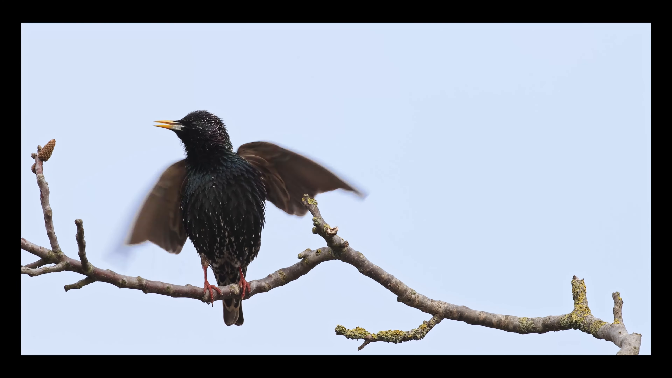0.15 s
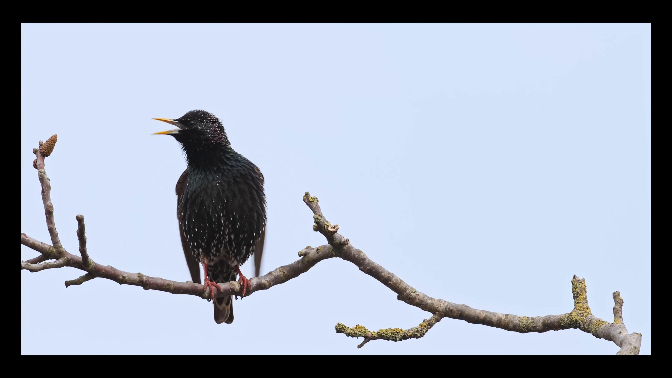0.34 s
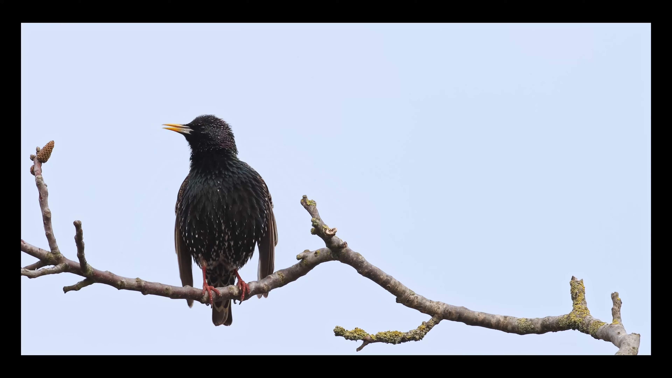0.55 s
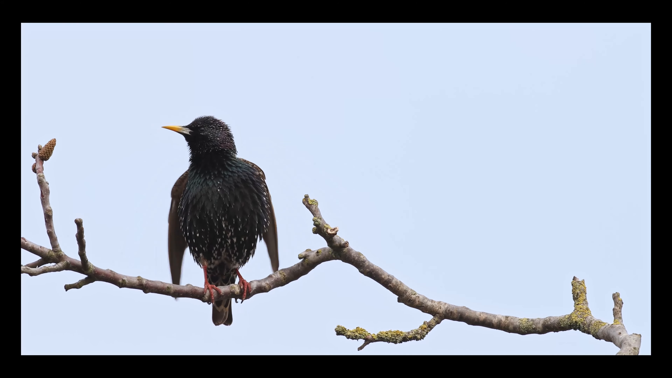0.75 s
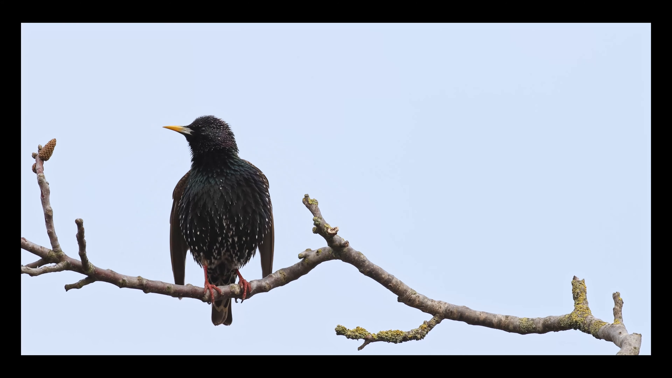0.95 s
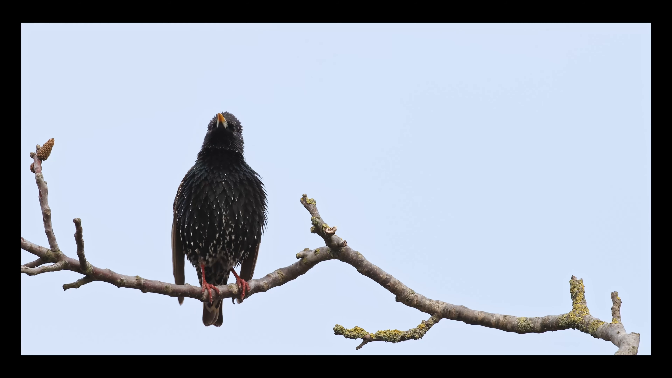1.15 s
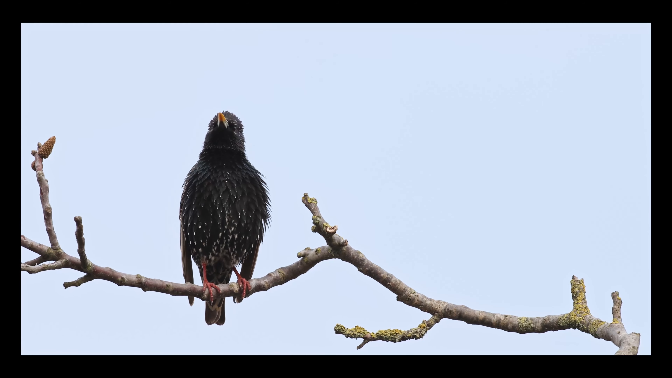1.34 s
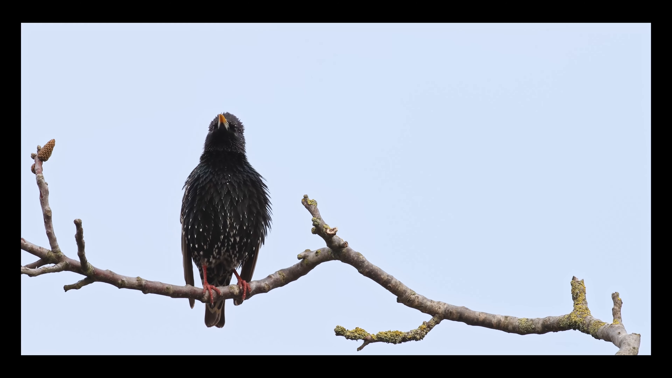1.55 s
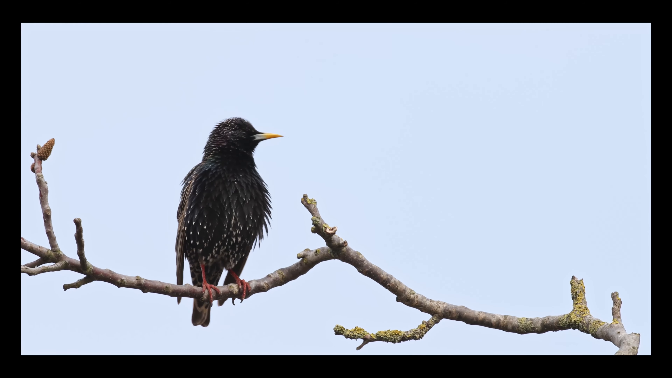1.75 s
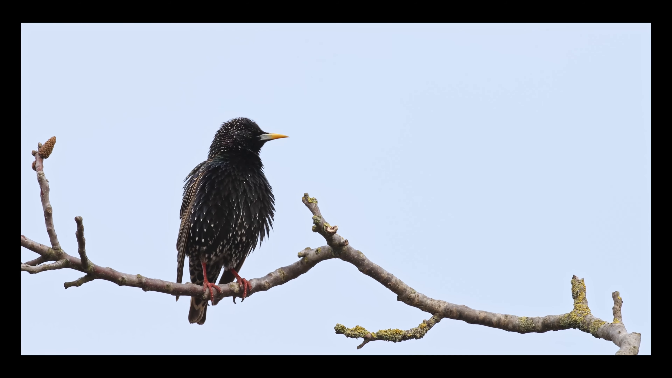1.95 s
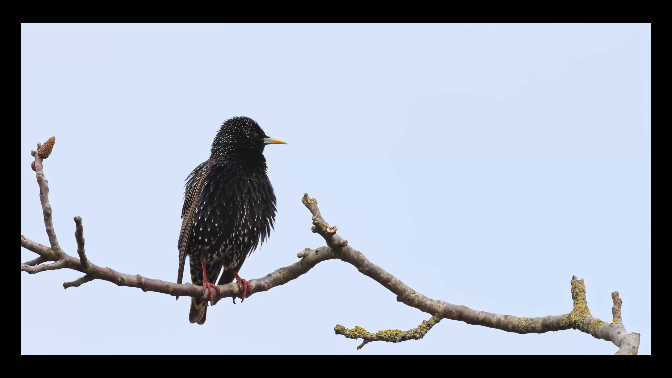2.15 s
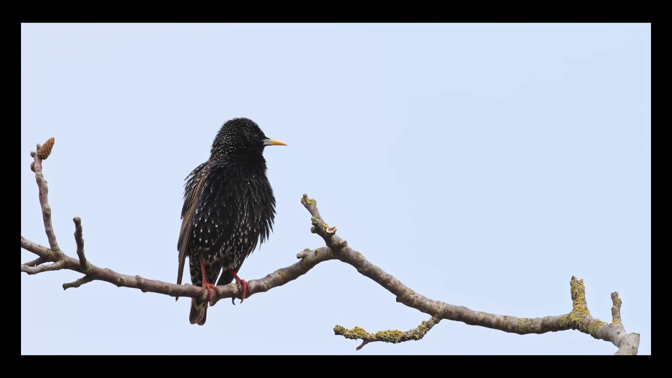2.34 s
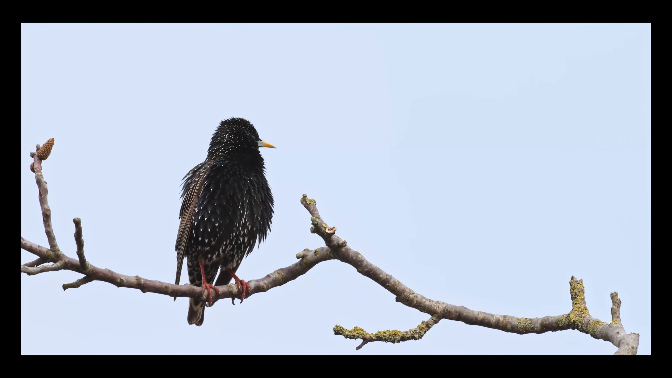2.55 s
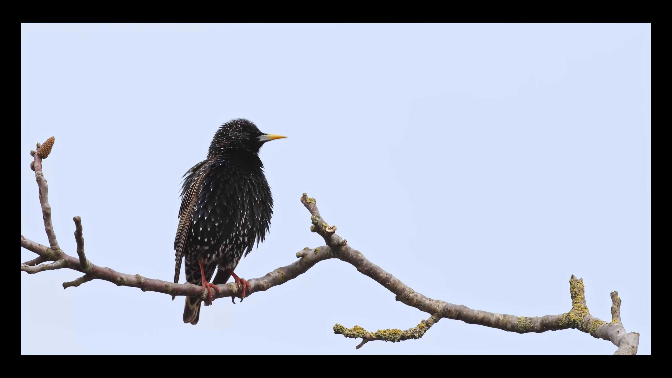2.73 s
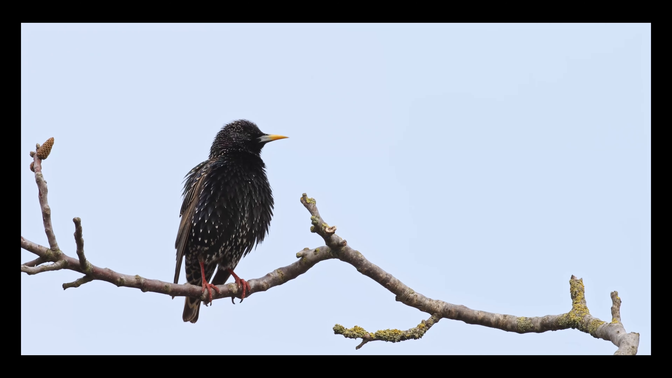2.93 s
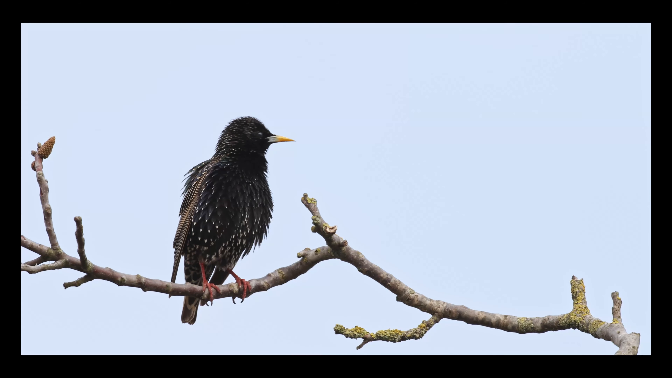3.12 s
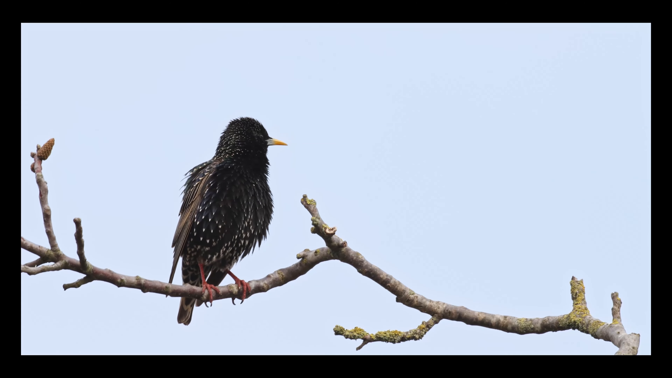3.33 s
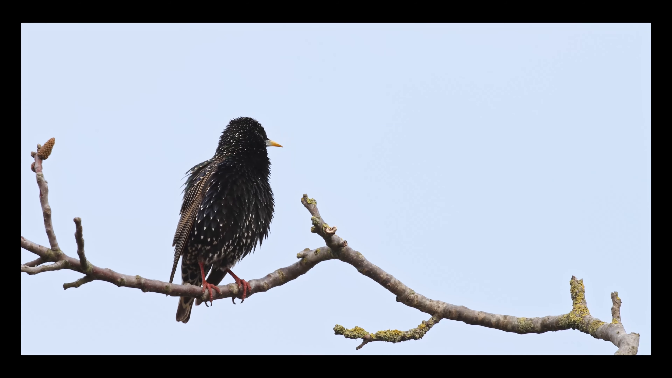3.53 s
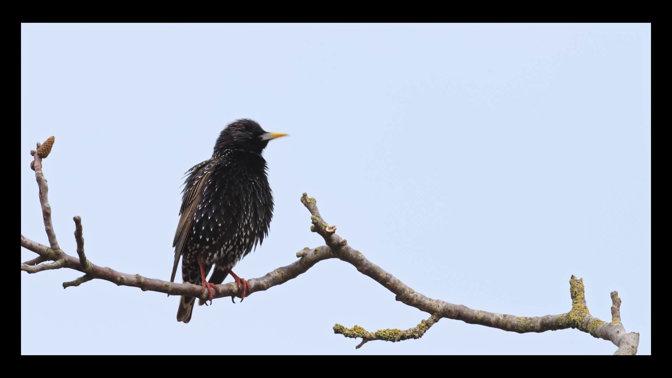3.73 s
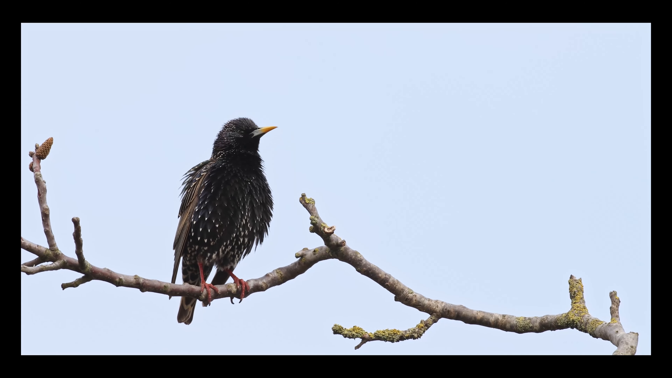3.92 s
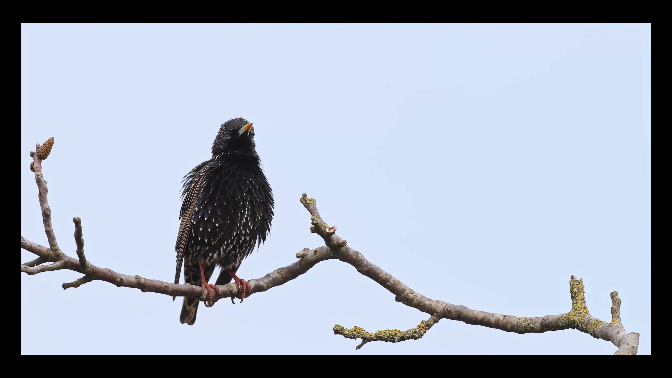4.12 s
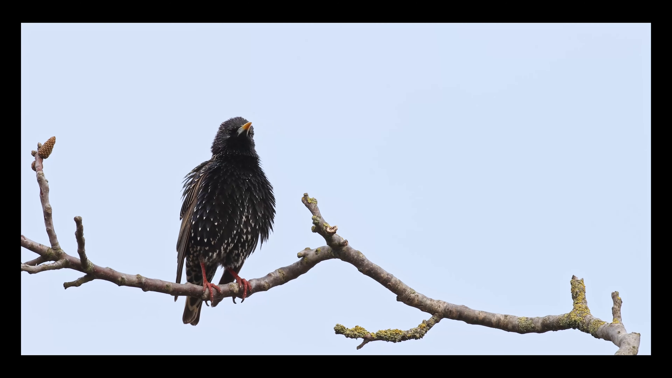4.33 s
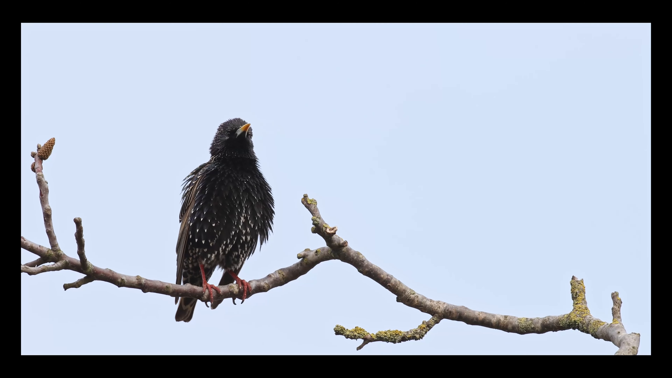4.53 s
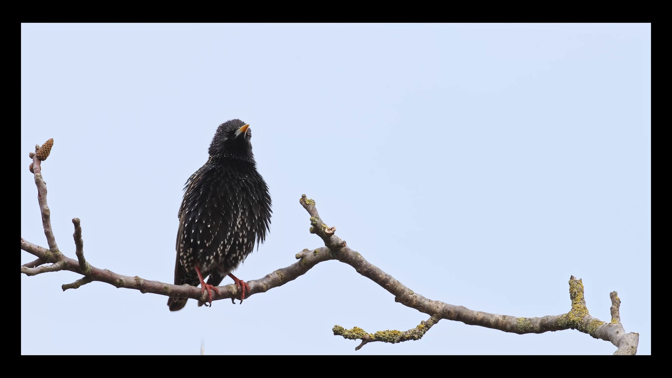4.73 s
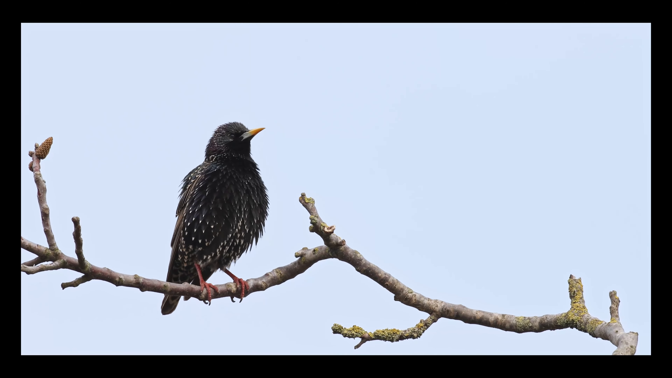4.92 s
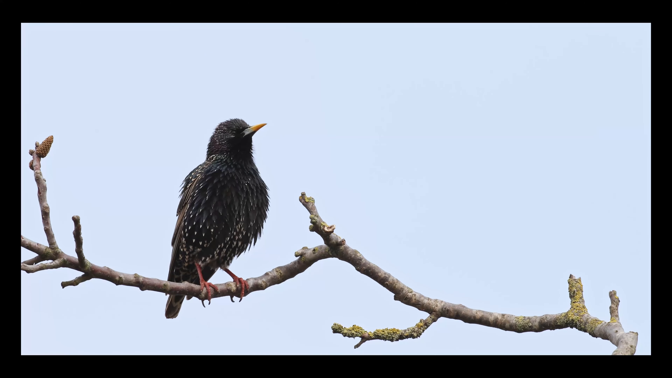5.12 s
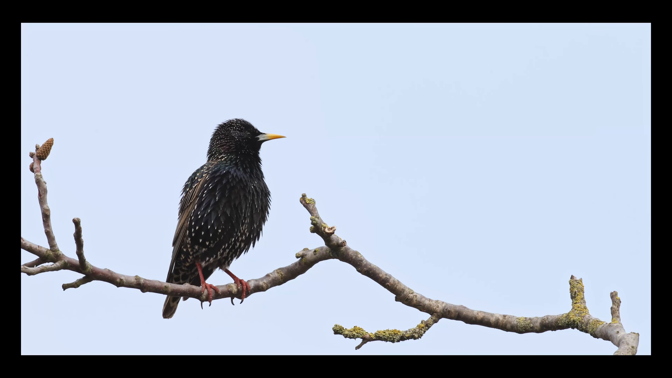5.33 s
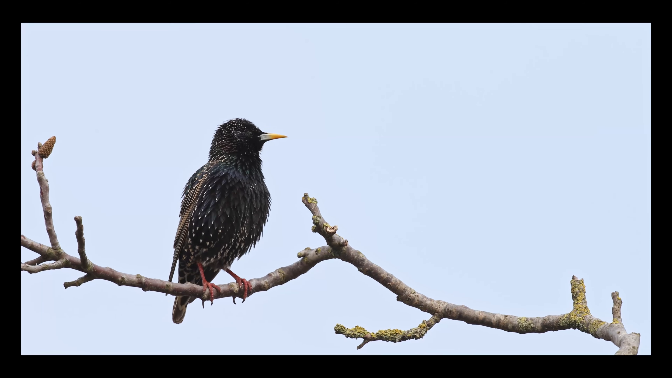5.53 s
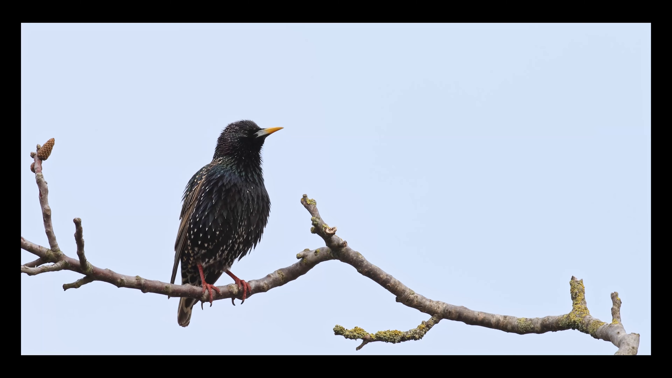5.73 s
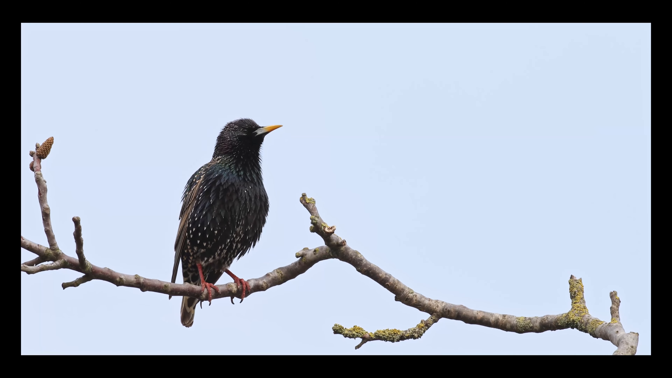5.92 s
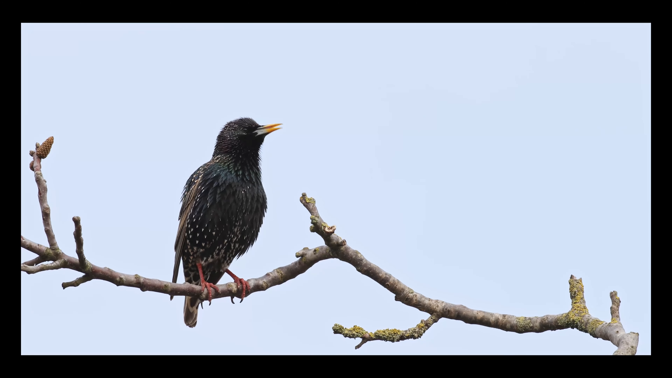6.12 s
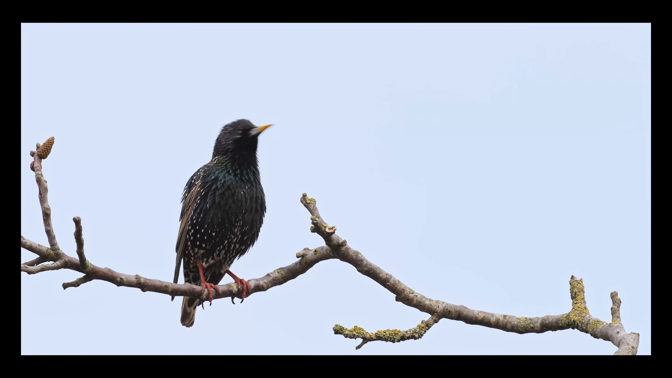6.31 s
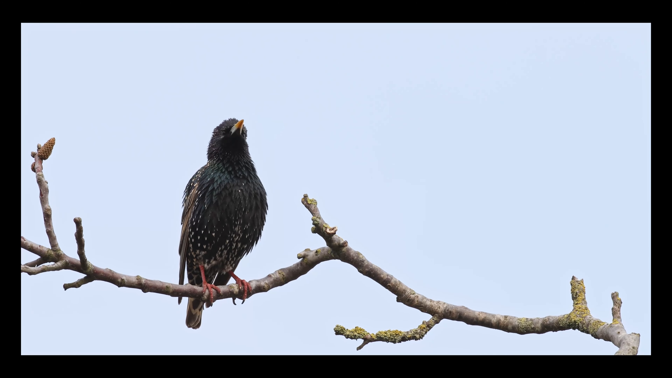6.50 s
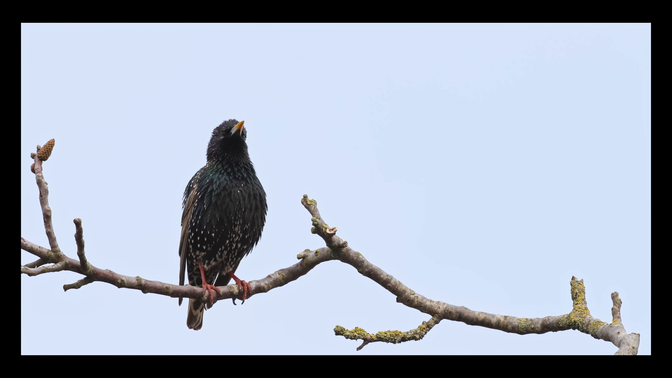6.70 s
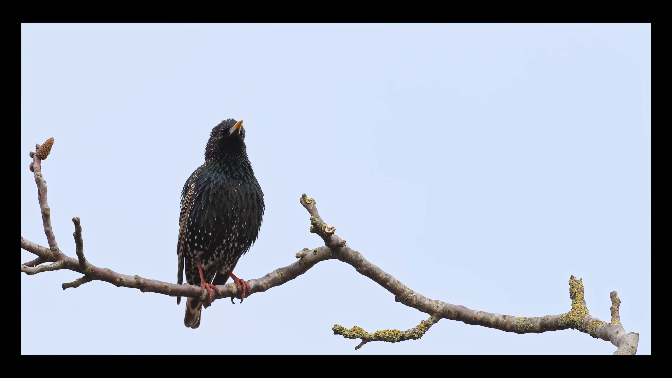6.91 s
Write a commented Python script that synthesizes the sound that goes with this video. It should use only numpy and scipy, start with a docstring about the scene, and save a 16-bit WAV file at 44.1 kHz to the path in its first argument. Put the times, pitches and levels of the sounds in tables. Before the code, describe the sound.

A starling sings close by among trees. Soft rattles and husky downward slurs weave around five piercing, very high trilled notes. A few dry clicks follow, then a thin, long falling whistle and short nasal calls. Smaller birds answer from farther off with a light echo. Distant traffic hums under a faint hiss, and a puff of wind bumps the microphone near the end.

```python
"""Among trees, on a bare branch, a starling sings: soft rattles and falling slurs lead into five piercing
notes, trilled by a fluttering syrinx membrane; then come clicks, a long falling whistle and nasal calls.
Other small birds answer; twigs smear the song and the trees echo it.
Distant traffic hums under a faint hiss, and a puff of wind touches the microphone near the end."""
import sys
import numpy as np
from scipy import signal
from scipy.fft import rfft, irfft, next_fast_len
from scipy.io import wavfile
from scipy.ndimage import map_coordinates

SR = 44100
rng = np.random.default_rng(int(sys.argv[2]) if len(sys.argv) > 2 else 0)


def output_pcm(signal):
    """Save a mono or channel-first signal as 16-bit PCM at the path in sys.argv[1].

    Samples are clipped to [-1, 1] before scaling.
    """
    pcm = np.clip(np.atleast_2d(signal).T, -1, 1) * 32767
    wavfile.write(sys.argv[1], SR, np.round(pcm).astype(np.int16))


N = 311346

# piercing notes: start/s, first trill dip/s, end/s, scoop depth/Hz, trill f/Hz, trill depth/Hz,
# chip level/dB, scoop level/dB, trill level/dB, closing arch level/dB
PIERCING_NOTES = [(0.224, 0.335, .57, 60, 7580, 834, -39, -42, -35, -55),
                  (0.945, 1.03, 1.235, 200, 7600, 824, -39.5, -40.5, -34, -56),
                  (1.62, 1.707, 1.86, 220, 7870, 684, -43.5, -56, -44, -57.5),
                  (1.943, 2.097, 2.283, 1400, 7830, 585, -64, -61, -44.5, -60.5),
                  (2.64, 2.727, 2.88, 285, 7560, 771, -53, -55, -48.5, -86)]


def piercing_notes(trill_rate_hz=36.4, flutter_hz=195, flutter_depth=0.53, dip_db=3, octave_db=-28):
    """Each note hooks down, then trills; in every dip of the trill the membrane flutters."""
    out = np.zeros(N)
    for start, first_dip, end, *shape, _ in PIERCING_NOTES:
        t = times(start, end)
        pitch_hz, db, depth_hz = gesture(t, start, first_dip, end, *shape)
        dip = (1 + np.tanh(2 * np.cos(2 * np.pi * trill_rate_hz * (t - first_dip)))) / 2
        grip_hz = depth_hz * (.35 + .65 * dip) * (1 + .15 * wobble(t, 70))
        pitch_hz += (55 + .08 * depth_hz) * wobble(t, 55)
        flutter = cycle(t, flutter_hz, scatter=.13)
        jitter_hz = (30 + .07 * grip_hz) * wobble(t, 700)
        hz = pitch_hz - depth_hz * dip + .36 * grip_hz * np.sin(flutter) + jitter_hz
        strain = np.clip(grip_hz / 800, 0, 1)
        gain = amp(db + dip_db * strain * (2 * dip - 2.5) + wobble(t, 128.3))
        gain *= 1 - flutter_depth * strain * np.cos(flutter)  # loudest on the downward sweep
        add(out, t, gain * fade(t, .004) * (tone(hz) + amp(octave_db) * tone(2 * hz)))
    return out


def gesture(t, start, first_dip, end, scoop_hz, trill_hz, depth_hz, chip_db, scoop_db, trill_db):
    """Pitch, level and trill depth of a note: high chip, scoop, then a trill that climbs and narrows."""
    chip_hz, hold_hz, climb_hz = 8630, 7040, 399
    chip_at_s, chip_width_s, half_open_s = start + .0097, .012, .0297
    thinning_db, closing_db = -8, -3.5
    chip = bell(t, chip_at_s, chip_width_s)
    lift = np.where(t < chip_at_s, chip ** .25, chip)
    thinning = bell(t, chip_at_s + chip_width_s, chip_width_s / 2)
    scoop = bell(t, start + .06, width_s=.032)
    progress = np.clip((t - first_dip) / (end - first_dip), 0, 1)
    opened = ramp(t, first_dip - half_open_s, first_dip + half_open_s)
    closed = ramp(progress, .61, .88)
    hz = hold_hz + (chip_hz - hold_hz) * lift - scoop_hz * scoop
    hz += (trill_hz - hold_hz) * opened + climb_hz * np.sin(np.pi / 2 * progress / .72)
    db = trill_db + (chip_db - trill_db) * lift + (scoop_db - trill_db) * scoop
    db += thinning_db * thinning + closing_db * closed
    return hz, db, depth_hz * np.sqrt(opened) * (1 - .7 * closed)


def buzz(peak_s=.364, width_s=.041, db=-38, start_hz=5430, sag_hz=420, swing_hz=230, octave_db=-12):
    """The other side of the syrinx swells under the first note, pulsed, and sags as it lets go."""
    out, t = np.zeros(N), times(peak_s - 2 * width_s, peak_s + 2 * width_s)
    effort = bell(t, peak_s, width_s)
    pitch_hz = start_hz - sag_hz * ramp(t, peak_s, peak_s + .054)
    flutter = cycle(t, rate_hz=185, scatter=.097)
    hz = pitch_hz + swing_hz * np.sin(flutter) + 110 * wobble(t, 601)
    voice = tone(hz) + amp(octave_db) * effort ** .11 * tone(2 * hz)
    pulses = 1 + .46 * np.sin(flutter + 1)
    add(out, t, amp(db) * effort * fade(t, .004) * pulses * voice)
    return out


def arches(lead_s=.027, length_s=.02, foot_hz=5120, top_hz=5740):
    """The lower voice adds a small pitch arch just before each piercing note ends."""
    rows = [(end - lead_s, length_s, foot_hz, top_hz, foot_hz, db)
            for _, _, end, *_, db in PIERCING_NOTES]
    return slurs(rows, rough=.3, width_hz=700)


def rattles(rate_hz=82, swing=.13, rasp_hz=160, uneven_db=2):
    """Uneven strings of tiny rasping pitch arches; the softer ones are mostly air."""
    # t/s, length/s, start f/Hz, end f/Hz, level/dB
    strings = [(0.121, .16, 2317, 3550, -50.5), (0.115, 0.22, 1892, 2040, -59),
               (0.707, 0.076, 4200, 4950, -62.5), (0.72, 0.11, 2920, 2600, -64),
               (1.276, 0.15, 2570, 2950, -61), (1.378, 0.08, 3850, 4720, -65),
               (1.387, .12, 3050, 2700, -63.5), (2.414, .099, 4080, 5440, -70),
               (5.172, 0.056, 1850, 1620, -56), (5.179, 0.045, 2920, 2660, -67),
               (5.45, 0.088, 1900, 2900, -63.5)]
    out = np.zeros(N)
    for start, length, start_hz, end_hz, db in strings:
        t = times(start, start + length)
        beat = cycle(t, rate_hz, scatter=.14)
        rough = np.interp(db, [-62, -53], [.65, .15])
        hz = arc(t, start_hz, end_hz) * (1 + swing * np.sin(beat)) + rasp_hz * wobble(t, 297.6)
        gain = amp(db + uneven_db * wobble(t, 264.4)) * (1 + .45 * np.cos(beat - .6))
        add(out, t, gain * fade(t, length / 4) * husky(t, hz, rough, width_hz=1100))
    return out


def falling_slurs():
    """The starling's soft, husky downward glides."""
    # t/s, length/s, start f/Hz, end f/Hz, level/dB
    notes = [(.16, 0.05, 4500, 3650, -63), (.835, 0.067, 6100, 4430, -71), (.888, 0.052, 4730, 2280, -59.5),
             (1.52, .084, 5700, 3340, -62), (1.592, 0.031, 5600, 4600, -68), (2.548, .027, 5640, 5240, -68),
             (2.585, 0.03, 4700, 3880, -68.5), (4.592, 0.04, 2310, 2130, -60.5)]
    return slurs(notes, rough=.3, width_hz=700)


def nasals(harmonics=6, half_width_hz=620):
    """Slightly hoarse harmonic calls shaped by one throat resonance."""
    # t/s, length/s, start f/Hz, middle f/Hz, end f/Hz, level/dB, throat resonance/Hz
    calls = [(1.611, 0.032, 996, 1011, 750, -54.5, 1960), (3.019, 0.021, 1067, 993, 755, -52.5, 1990),
             (6.088, 0.046, 1048, 1255, 1066, -49.5, 3120), (6.216, 0.035, 1028, 1206, 1065, -50, 3020),
             (6.496, .042, 1044, 933, 720, -57.5, 2200), (6.683, 0.033, 916, 873, 806, -66, 2240)]
    out = np.zeros(N)
    for start, length, *path_hz, db, throat_hz in calls:
        t = times(start, start + length)
        hz = arc(t, *path_hz) + 8 * wobble(t, 400)
        voice = np.zeros(len(t))
        for k in range(1, harmonics + 1):
            resonance = 1 / (1 + ((k * hz - throat_hz) / half_width_hz) ** 2)
            voice += resonance * husky(t, k * hz, rough=.05, width_hz=600)
        add(out, t, amp(db) * fade(t, .003) * unit(voice))
    return out


def whistle(waver_hz=30, gain_db=-1, flicker_db=2.5):
    """One thin, unsteady whistle sinks by nearly an octave."""
    # t/s, f/Hz, level before gain_db/dB
    path = [(4.8, 4877, -83), (4.874, 4773, -50), (4.944, 4660, -66), (5.082, 4720, -77),
            (5.156, 4490, -61), (5.298, 4490, -74), (5.308, 4230, -73), (5.472, 4210, -74),
            (5.538, 3875, -65), (5.878, 3300, -57), (5.938, 2950, -52.5), (5.998, 2869, -55),
            (6.07, 2630, -60)]
    out, t = np.zeros(N), times(path[0][0], path[-1][0])
    hz, db = curves(path, t)
    flicker = amp(flicker_db * wobble(t, 40))
    voice = husky(t, hz + waver_hz * wobble(t, 45), rough=.07, width_hz=350)
    add(out, t, amp(db + gain_db) * fade(t, .0052) * flicker * voice)
    return out


def clicks():
    """Short dry cracks of decaying noise, dull or bright."""
    # t/s, level/dB, t60/s, low-pass edge/Hz
    cracks = [(3.4762, -52, 0.0066, 2500), (3.4793, -39, 0.045, 1100), (3.488, -51, 0.028, 13000),
              (3.638, -49, 0.023, 3480)]
    out = np.zeros(N)
    for start, db, t60_s, edge_hz in cracks:
        t = times(start, start + .04)
        band = signal.butter(1, [160, edge_hz], "band", fs=SR)
        burst = unit(signal.lfilter(*band, rng.standard_normal(len(t))))
        add(out, t, amp(db - 60 * (t - start) / t60_s) * burst)
    return out


def tit(drop_s=.08, drop_share=.27, drop_db=-12):
    """A tit's high calls hold, then drop in pitch and level."""
    # t/s, hold/s, f/Hz, level/dB
    calls = [(5.29, 0.063, 6840, -51), (5.474, 0.059, 6770, -52), (5.651, 0.054, 6630, -51.5)]
    out = np.zeros(N)
    for start, hold_s, hz, db in calls:
        t = times(start, start + hold_s + drop_s)
        drop = np.clip((t - start - hold_s) / drop_s, 0, 1)
        voice = husky(t, hz * (1 - drop_share * drop ** 1.3), rough=.1, width_hz=400)
        add(out, t, amp(db + drop_db * drop) * fade(t, .013) * voice)
    return out


def tit_run(count=7, start_s=6.003, step_s=.0904, length_s=.028, path_hz=(5330, 4280, 3910), db=-52.5):
    """The tit closes with an even run of steep, raspy down-slurs."""
    rows = [(start_s + k * step_s, length_s, *path_hz, db) for k in range(count)]
    return slurs(rows, rough=.65, width_hz=1300, edge_share=.25)


def twitter(count=6, start_s=4.05, step_s=.065, length_s=.0273, db=-61.5, step_db=-2.7):
    """A small bird's run of falling chirps, each weaker than the last and randomly detuned."""
    path_hz = np.array([4680, 4280])
    detune = 1 + .0195 * rng.standard_normal(count)
    rows = [(start_s + k * step_s, length_s, *(path_hz * detune[k]), db + k * step_db)
            for k in range(count)]
    return slurs(rows, rough=.35, width_hz=500)


def neighbours():
    """Birds in the trees give thin whistles, slurs and one hoarse falling call."""
    # t/s, length/s, start f/Hz, end f/Hz, level/dB
    thin_calls = [(3.405, 0.021, 5470, 5430, -69), (3.66, 0.23, 4050, 3870, -72),
                  (4.39, .16, 5680, 5860, -62.5), (4.46, 0.059, 3900, 3330, -64.5),
                  (4.7, 0.096, 7420, 7750, -65), (4.96, .3, 5770, 5736, -61), (5.2, 0.043, 4500, 3410, -57),
                  (5.79, .08, 5140, 4350, -65), (5.858, 0.053, 4810, 4390, -51.5),
                  (6.3, 0.36, 567, 532.5, -65.5), (6.7, 0.22, 4860, 4820, -73),
                  (6.88, 0.076, 4170, 3590, -65.5), (7.015, .076, 7650, 7800, -62.5)]
    # t/s, length/s, start f/Hz, middle f/Hz, end f/Hz, level/dB
    hoarse_call = [(6.58, .15, 5900, 5770, 4800, -56.5)]
    thin = slurs(thin_calls, rough=.25, width_hz=250)
    return thin + slurs(hoarse_call, rough=.7, width_hz=700, edge_share=.35)


def twigs(x, spread_s, direct_share):
    """Branches on the way scatter part of the power, smearing it over hundredths of a second."""
    t = times(0, 5 * spread_s)
    response = rng.standard_normal(len(t)) * np.exp(-t / spread_s)
    response *= np.sqrt(1 - direct_share) / np.linalg.norm(response)
    response[0] = np.sqrt(direct_share)
    return signal.fftconvolve(x, response)[:N]


def trees(x, delay_s=.0026, build_s=.0083):
    """Trunks and twigs scatter a soft tail that builds up and dies by band."""
    # f/Hz, t60/s
    decay = [(300, 0.49), (2500, 0.68), (5000, 0.91), (7500, 0.76), (12000, 0.27)]
    hz, t, bands = signal.stft(rng.standard_normal(SR), SR, nperseg=256)
    tail = signal.istft(bands * amp(-60 * t / along(decay, hz)[:, None]), SR, nperseg=256)[1]
    age_s = np.maximum(np.arange(len(tail)) / SR - delay_s, 0)
    tail *= 1 - np.exp(-age_s / build_s)
    return signal.fftconvolve(x, tail / np.linalg.norm(tail))[:N]


def traffic(t, rumble_db=-51, hum_gain_db=-3):
    """Far traffic rumbles and hums; one vehicle's drone dies away."""
    # f/Hz, relative density/dB
    rumble_spectrum = [(15, -12), (25, -18), (58, -0.5), (91, -9.5), (124, -2), (217, -1.5), (242, -3),
                       (273, -6.5), (295, -5), (492, -23.5), (548, -18.5), (690, -22), (757, -18),
                       (1000, -31.5), (1300, -63), (2200, -120)]
    drone_spectrum = [(40, -24), (90, -15), (150, -7.5), (195, 0.5), (225, -9), (270, -12), (330, -15),
                      (450, -21.5), (1000, -120)]
    # t/s, level/dB
    drone_level = [(0, -42), (.12, -41.5), (.24, -48), (.5, -47), (.9, -60.5), (1.3, -83)]
    # f/Hz, level before hum_gain_db/dB
    hum_tones = [(48.4, -61.5), (134.6, -60), (269.2, -58.5)]
    rumble = amp(rumble_db + .57 * wobble(t, 5.6)) * noise(rumble_spectrum)
    drone = amp(curves(drone_level, t)[0]) * noise(drone_spectrum)
    hum = sum(amp(db + hum_gain_db + 2.1 * wobble(t, 5)) * tone(hz + 2 * wobble(t, 8))
              for hz, db in hum_tones)
    return rumble + drone + hum


def wind_puff(t):
    """One puff of wind buffets the microphone."""
    # t/s, level/dB
    level = [(6.35, -96), (6.47, -51), (6.52, -39), (6.61, -43), (6.68, -51.5), (7.06, -56)]
    # f/Hz, relative density/dB
    spectrum = [(15, -8), (30, 2.5), (55, 4.5), (115, 5), (200, -12), (500, -35), (1500, -120)]
    return amp(curves(level, t)[0]) * noise(spectrum)


def hiss(mid_db=-60.5, side_db=-62):
    """Faint stereo hiss: one part alike at both ears, one opposite in sign."""
    # f/Hz, relative density/dB
    mid_spectrum = [(700, -48), (1100, 0.5), (1500, 3.5), (1900, 2), (2700, -3), (3500, -4.5),
                    (4400, -10.5), (6000, -5), (8000, -3.5), (11000, -1.5), (15500, -1.5)]
    side_spectrum = [(24, -36), (40, -13), (202, -2.5), (496, -13), (998, -16), (2390, -4), (2920, -9),
                     (4130, -35), (4800, -13), (6980, -2), (15500, 2)]
    side = amp(side_db) * noise(side_spectrum)
    return amp(mid_db) * noise(mid_spectrum) + np.array([side, -side])


def slurs(rows, rough, width_hz, edge_share=.2):
    """Husky glides that swell and fade; rows: t/s, length/s, two or three f/Hz, level/dB."""
    out = np.zeros(N)
    for start, length, *path_hz, db in rows:
        t = times(start, start + length)
        add(out, t, amp(db) * fade(t, edge_share * length) * husky(t, arc(t, *path_hz), rough, width_hz))
    return out


def husky(t, hz, rough, width_hz):
    """A gliding tone; the share rough of its power is noise that follows the pitch."""
    grain = wobble(t, width_hz) + 1j * wobble(t, width_hz)
    carrier = np.exp(2j * np.pi * np.cumsum(hz) / SR)
    return np.real((np.sqrt(2 * (1 - rough)) + np.sqrt(rough) * grain) * carrier)


def tone(hz):
    """Sine of rms 1 along a pitch path."""
    return np.sqrt(2) * np.sin(2 * np.pi * np.cumsum(hz) / SR)


def cycle(t, rate_hz, scatter):
    """Phase of a slightly uneven oscillation."""
    return 2 * np.pi * np.cumsum(rate_hz * (1 + scatter * wobble(t, rate_hz / 2))) / SR


def arc(t, *path_hz):
    """Pitch path: straight through two pitches, parabolic through three."""
    shape = np.polyfit(np.linspace(0, 1, len(path_hz)), path_hz, len(path_hz) - 1)
    return np.polyval(shape, np.linspace(0, 1, len(t)))


def wobble(t, rate_hz):
    """Smooth random curve, rate_hz knots a second."""
    position = (t - t[0]) * rate_hz
    return map_coordinates(rng.standard_normal(4096), [position + 2], mode="wrap")


def noise(spectrum):
    """Coloured noise of rms 1."""
    return unit(filtered(rng.standard_normal(N), lambda hz: amp(along(spectrum, hz))))


def filtered(x, response):
    """Apply a frequency response."""
    size = next_fast_len(N + SR // 2)
    return irfft(rfft(x, size) * response(np.fft.rfftfreq(size, 1 / SR)), size)[..., :N]


def fade(t, edge_s):
    """Soft opening and closing of a note."""
    return ramp(np.minimum(t - t[0], t[-1] - t), 0, edge_s)


def ramp(t, start, end):
    """Smooth step from 0 to 1."""
    return np.sin(np.pi / 2 * np.clip((t - start) / (end - start), 0, 1)) ** 2


def bell(t, centre_s, width_s):
    """Smooth hump of height 1."""
    return np.exp(-((t - centre_s) / width_s) ** 2)


def along(points, hz):
    """Read (f/Hz, value) points on a log axis."""
    knots_hz, values = np.transpose(points)
    return np.interp(np.log(hz + 1), np.log(knots_hz), values)


def curves(rows, t):
    """Each column after the time, read at times t."""
    knots_s, *columns = np.transpose(rows)
    return [np.interp(t, knots_s, column) for column in columns]


def times(start_s, end_s):
    """Sample times of a span."""
    return start_s + np.arange(max(int((end_s - start_s) * SR), 64)) / SR


def add(track, t, sound):
    """Mix a sound into a track at t[0]."""
    part = track[max(round(t[0] * SR), 0):][:len(sound)]
    part += sound[:len(part)]


def amp(db):
    """Decibels to gain."""
    return 10 ** (np.asarray(db) / 20)


def unit(x):
    """Scale to rms 1."""
    return x / np.sqrt(np.mean(x ** 2) + 1e-20)


def scene(near_echo_db=-17, far_echo_db=-6.5, far_direct_db=-1):
    """The starling is close and nearly dry; the other birds are washed in echo."""
    # a head turned away sends more sound to the trees: t/s, added echo/dB
    head_turn = [(1.2, 0.5), (1.7, 5.5), (3.0, 5), (4.8, 7)]
    t = np.arange(N) / SR
    song = falling_slurs() + piercing_notes() + buzz() + arches() + rattles() + nasals() + whistle()
    starling = twigs(song, spread_s=.012, direct_share=.88) + clicks()
    far_birds = twigs(tit() + tit_run() + twitter() + neighbours(), spread_s=.02, direct_share=.75)
    turn_db = curves(head_turn, t)[0]
    echo = trees(amp(near_echo_db + turn_db) * starling + amp(far_echo_db) * far_birds)
    return starling + amp(far_direct_db) * far_birds + echo + traffic(t) + wind_puff(t) + hiss()


def record(dry):
    """Brick-wall low-pass."""
    return filtered(dry, lambda hz: hz < 15820)


dry = scene()
out = record(dry)
output_pcm(out)
```